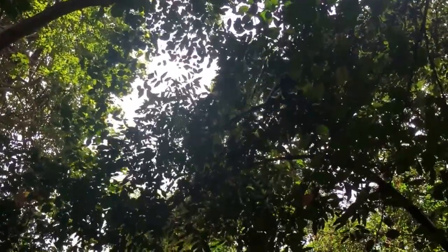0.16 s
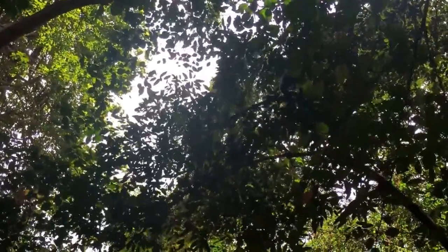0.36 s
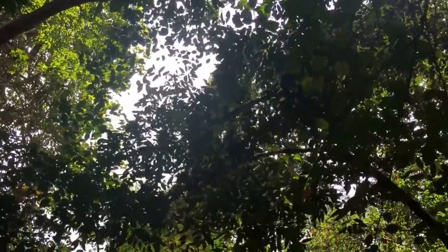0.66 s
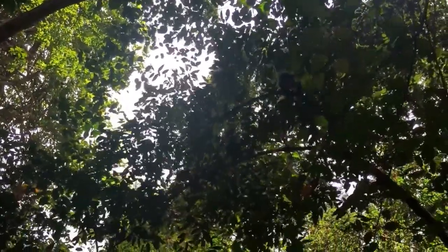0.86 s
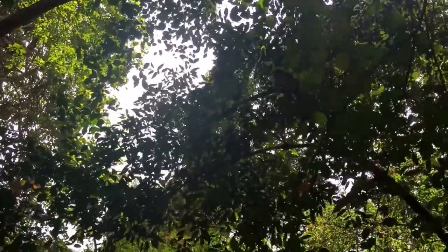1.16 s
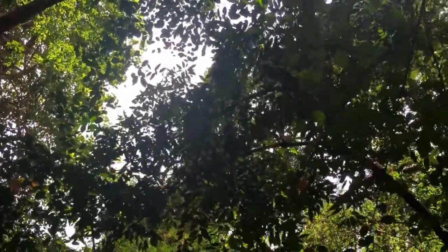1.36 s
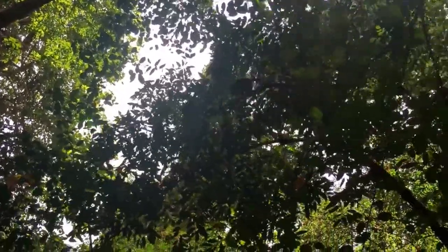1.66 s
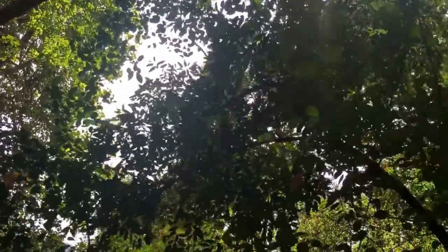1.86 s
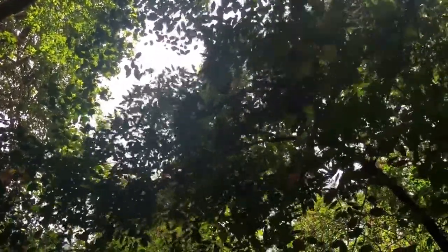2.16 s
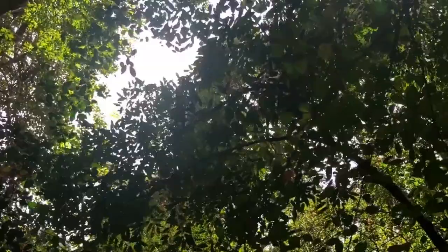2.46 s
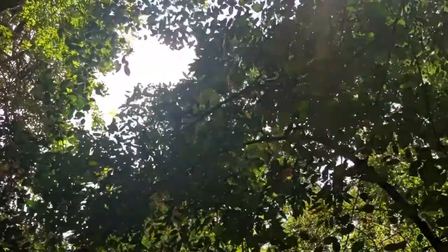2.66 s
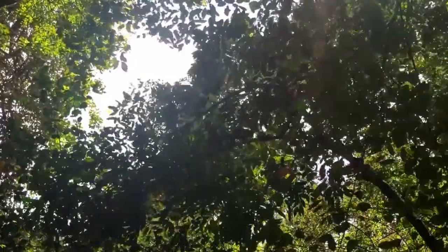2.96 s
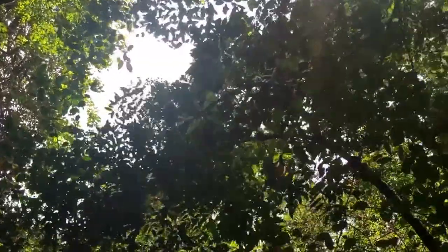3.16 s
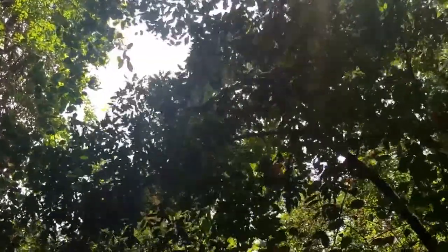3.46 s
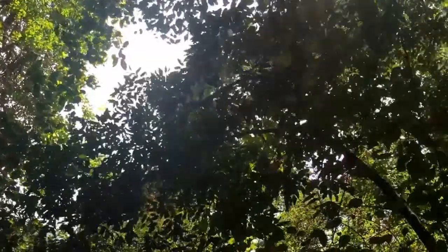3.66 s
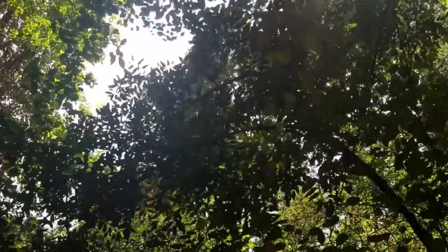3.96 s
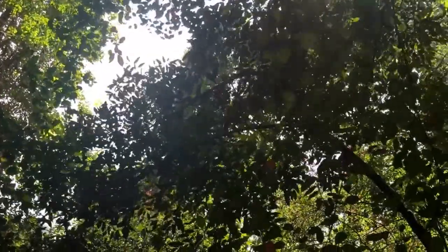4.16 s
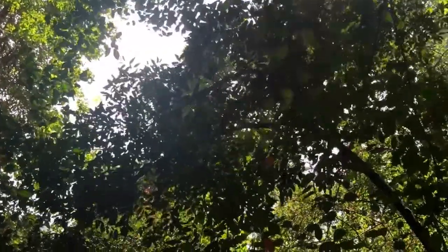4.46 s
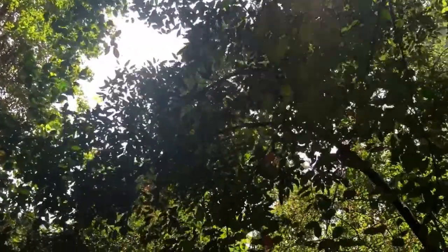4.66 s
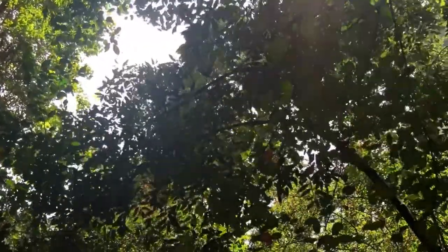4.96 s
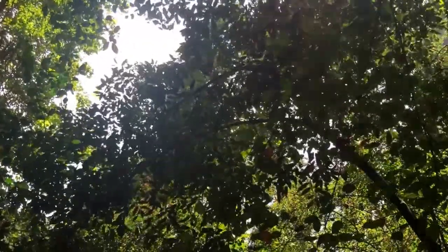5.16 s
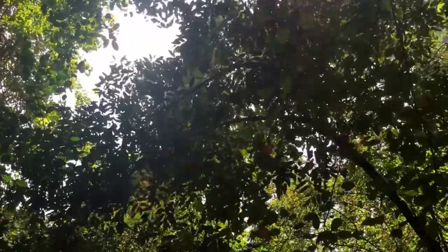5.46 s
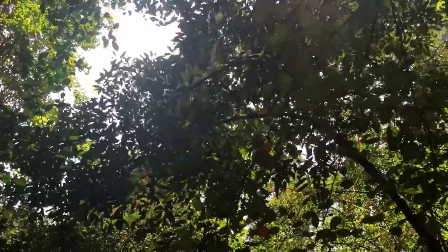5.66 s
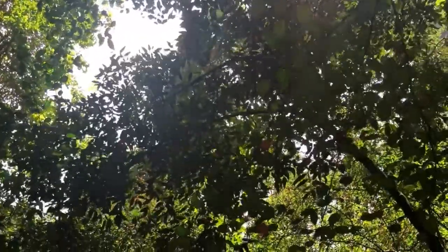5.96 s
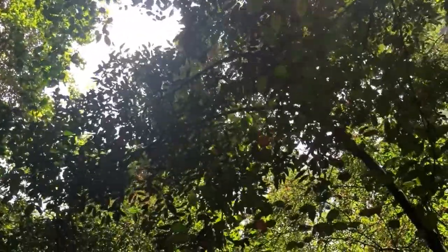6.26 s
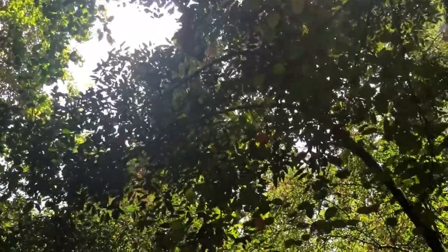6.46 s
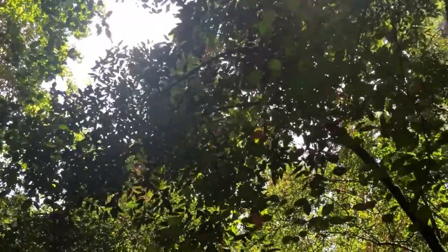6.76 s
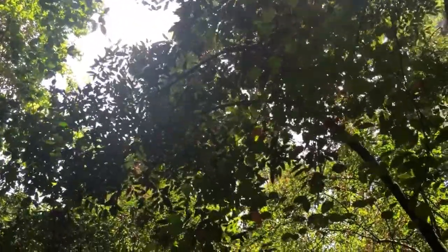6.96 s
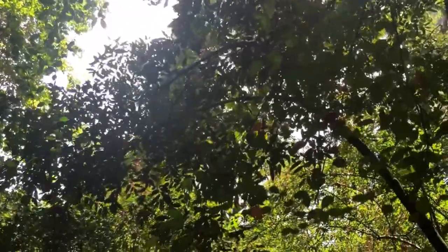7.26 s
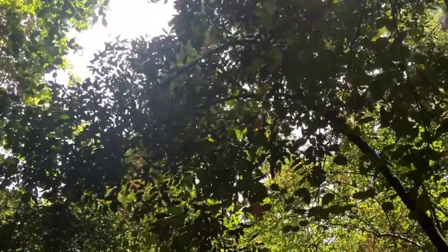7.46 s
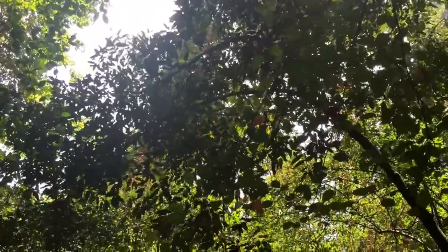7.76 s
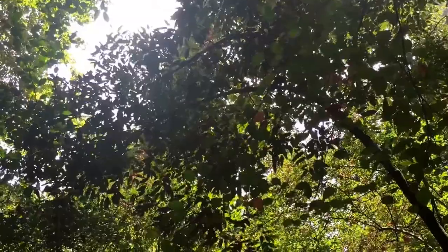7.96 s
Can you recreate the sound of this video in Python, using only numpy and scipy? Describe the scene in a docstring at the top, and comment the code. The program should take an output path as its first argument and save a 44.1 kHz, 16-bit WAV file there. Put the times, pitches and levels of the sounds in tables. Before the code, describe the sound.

Continuous high insect hiss fills a leafy forest, with a faint narrow buzzing chorus below it and a low, wavering motor hum far off through the trees. Early on, dry leaves near the microphone tick, then crackle sharply in two quick bursts, with patchy rustling that dies away by around three seconds. Afterwards the cicadas continue, gradually louder, over the soft low rumble. Centred mono sound.

```python
"""Far cicada choruses under a tropical canopy: overlapping singers blur to hiss in fixed bands, swelling
slowly. A lower insect chorus is dense clicks ringing a narrow body. A distant engine drones unevenly through
the trees as wavering multiples of its firing rate, over a low wash of filtered noise. Leaves nearby rustle
in a gust with two sharper bursts: patchy hiss, crackles, ticks and snaps. One microphone feeds both channels."""
import sys
import numpy as np
from scipy import signal
from scipy.io import wavfile
from scipy.ndimage import uniform_filter1d

SR = 44100
rng = np.random.default_rng(int(sys.argv[2]) if len(sys.argv) > 2 else 0)


def pcm_store(signal):
    """Save signal as 16-bit PCM."""
    levels = np.round(np.clip(np.atleast_2d(signal), -1, 1) * 32767)
    wavfile.write(sys.argv[1], SR, levels.astype(np.int16).T)


N = 358077


def amp(db):
    """Gain of a level in dB."""
    return 10 ** (np.asarray(db) / 20)


def evened(x):
    """Scaled to rms 1."""
    return x / np.sqrt(np.mean(x ** 2) + 1e-20)


def columns(rows):
    """Each column of a curve table after its start_s, drawn as straight lines with one value a sample."""
    start_s, *values = np.transpose(rows)
    return [np.interp(np.arange(N) / SR, start_s, v) for v in values]


def shape_db(points, hz):
    """A spectrum table read at hz along a log frequency axis, -120 dB outside its ends."""
    point_hz, db = np.transpose(points)
    return np.interp(np.log(hz + 1), np.log(point_hz + 1), db, -120, -120)


def drift(rate_hz):
    """Slow chance of rms 1: noise low-passed at rate_hz, after a second to settle."""
    sos = signal.butter(2, rate_hz, fs=SR, output="sos")
    return evened(signal.sosfilt(sos, rng.standard_normal(N + SR))[SR:])


def hiss(points, size, patchy_db):
    """Noise of rms 1 from random short-time spectra, coloured by a table, with drifting patches."""
    hop = size // 4
    frames = N // hop + 5
    hz = np.fft.rfftfreq(size, 1 / SR)
    real, imaginary, patches = rng.standard_normal((frames, len(hz), 3)).T
    patches = uniform_filter1d(patches, size=2, axis=0)  # across frequency
    patches = evened(uniform_filter1d(patches, size=8, axis=1))  # across time
    patches = np.minimum(patches, 1.1)  # hollows go deep, but no patch flares up
    gain = amp(shape_db(points, hz)[:, None] + patchy_db * patches)
    spectra = (real + 1j * imaginary) * gain
    return evened(signal.istft(spectra, nperseg=size, noverlap=size - hop)[1][:N])


def resonate(x, hz, width_hz):
    """A moving resonance: shifts the curve hz down to zero, smooths, and shifts back."""
    turn = np.exp(2j * np.pi * np.cumsum(hz) / SR)
    r = np.exp(-np.pi * width_hz / SR)
    return 2 * (turn * signal.lfilter([1 - r], [1, -r], x / turn)).real


def swells(rows, base_db):
    """A steady gain with bell-shaped swells added in power."""
    t = np.arange(N) / SR
    power = amp(2 * base_db)
    for centre_s, level_db, width_s in rows:
        power = power + amp(2 * level_db) * np.exp(-((t - centre_s) / width_s) ** 2)
    return np.sqrt(power)


def dips():
    """Gain of the low sounds: the bass dips briefly in bell-shaped hollows."""
    # moments of changed bass: centre_s, change_db
    hollows = [(.93, -4.5), (1.06, 0.5), (1.9, -8), (2.26, -9), (2.75, -8), (3.97, -1), (4.201, -8),
               (4.6, -2), (6.19, -4.5), (6.72, -4), (7.12, -7)]
    t, width_s = np.arange(N) / SR, 0.035
    return amp(sum(db * np.exp(-((t - centre_s) / width_s) ** 2) for centre_s, db in hollows))


def wash():
    """Low noise in four parts: fluttering wash, lowest rumble, a dull band and an even bed."""
    # colour of far traffic and air: frequency_hz, relative_db (per Hz)
    wash_colour = [(20, -48), (45, -18), (65, -15), (90, 3), (115, -4.5), (160, 4), (240, 0.5), (330, -6),
                   (450, -22), (600, -45)]
    # its level before flutter, dropouts and dips: start_s, level_db
    wash_level = [(0, -57.5), (.7, -58.5), (1.2, -55.5), (1.8, -59), (2.4, -57.5), (2.8, -57), (3.4, -56.5),
                  (3.85, -58), (4.8, -58.5), (5.3, -56), (5.9, -56.5), (6.5, -55.5), (7.1, -57),
                  (7.5, -56.5), (8.12, -56)]
    # swells of the lowest rumble: centre_s, level_db, width_s
    rumble_swells = [(1.55, -65, .1), (2.6, -75, 0.14), (3.12, -64, 0.069), (3.48, -59, 0.095),
                     (5.33, -61, 0.051), (6.5, -65, .15), (8.02, -62, 0.055)]
    # colour of the rumble: frequency_hz, relative_db (per Hz)
    rumble_colour = [(20, -37), (40, -17), (58, -13), (72, -11), (95, -30)]
    # swells of the dull band: centre_s, level_db, width_s
    dull_swells = [(0, -65.5, 0.11), (1.1, -67, 0.29), (3.15, -79, 0.16), (5.83, -67, 0.094),
                   (7.38, -67, 0.12), (7.52, -64, 0.088), (7.68, -67, 0.05), (8.12, -75, 0.11)]
    # colour of the dull band: frequency_hz, relative_db (per Hz)
    dull_colour = [(350, -7.5), (480, -5), (580, -1), (670, -1.5), (760, -8), (850, -15.5), (1000, -18)]
    # colour of the even bed of air: frequency_hz, relative_db (per Hz)
    air_colour = [(250, -19), (400, -4.5), (800, -0.5), (1400, -3), (2200, -9.5), (3000, -31)]

    dropouts_db = -9 * np.maximum(drift(34.4) - 0.8, 0)  # now and then the wash drops out briefly
    flutter_db = 2.6 * np.tanh(drift(9.4))
    low_db = columns(wash_level)[0] + dropouts_db + flutter_db
    low = dips() * amp(low_db) * hiss(wash_colour, size=2048, patchy_db=4.0)
    rumble_gain = dips() * swells(rumble_swells, base_db=-73.5) * amp(2.0 * drift(8.9))
    rumble = rumble_gain * hiss(rumble_colour, size=4096, patchy_db=6.0)
    dull = swells(dull_swells, base_db=-71.5) * hiss(dull_colour, size=1024, patchy_db=7.0)
    bed = amp(-70) * hiss(air_colour, size=1024, patchy_db=7.5)
    return low + rumble + dull + bed


def engine():
    """Multiples of an uneven firing rate; each wavers alone after many paths through the trees."""
    # course before wavering: start_s, firing_hz, level_db (2nd multiple), then relative to that level:
    # first_db, third_db, upper_db (reference of the upper multiples)
    engine_course = [(0, 75.3, -68.5, -2, -4, -2), (.5, 75, -64.5, 3.5, -11, -0.5),
                     (.9, 75.2, -62.5, 1, -4, -4), (1.45, 76.06, -55, -15, -10, -6),
                     (2, 74.64, -64.5, -5, 2, -5.5), (2.5, 75.6, -61, -14, -7, -15),
                     (2.9, 76.1, -67, -7, -9, -7), (3.25, 74.5, -58, -10, 1.5, -9),
                     (3.55, 75.96, -52.5, -26, -9.5, -9.5), (4.3, 77.24, -68, 7.5, 2.5, -6),
                     (4.8, 76.15, -60.5, -9, -5, -8), (5.4, 77.8, -71, 6.5, 6, 2),
                     (5.9, 77.4, -61, -6, -3.5, -4), (6.5, 75.05, -57.5, -9, -5, -20),
                     (7, 74.2, -59, 2.5, -5, -5), (7.45, 73.24, -54.5, -6, 1, -7),
                     (7.75, 73.5, -61, 3, -1, -2.5), (8.12, 73.4, -55, -7, -1, -11)]
    # upper multiples: multiple, relative_db (to upper_db)
    upper_orders = [(4, -5), (5, -12.5)]
    fading_db, fading_hz = 1.5, 18  # each of the three low multiples fades in and out on its own

    firing_hz, level_db, first_db, third_db, upper_db = columns(engine_course)
    turns = np.cumsum(firing_hz * (1 + 0.007 * drift(8))) / SR
    orders = []
    for k, db in enumerate([first_db, 0, third_db], 1):
        orders.append((k, db + fading_db * drift(fading_hz)))
    for k, db in upper_orders:
        orders.append((k, upper_db + db))
    out = np.zeros(N)
    for k, db in orders:
        # the share that arrives by shifting detours
        scattered = 0.8 * (drift(12) + 1j * drift(12))
        out += amp(level_db + db) * ((1 + scattered) * np.exp(2j * np.pi * k * turns)).real
    return amp(2.1 * drift(20)) * out  # uneven firing makes all multiples throb together


def low_chorus():
    """A lower-voiced insect chorus: dense irregular clicks ring a narrow body, throbbing loosely."""
    # course of the chorus: start_s, level_db, pitch_hz (before it wanders)
    chorus_course = [(0, -64, 1695), (.4, -63, 1737), (.9, -62, 1760), (1.03, -60.5, 1750),
                     (1.15, -65, 1701), (1.8, -60.5, 1750), (2.2, -59, 1710), (2.36, -63.5, 1710),
                     (2.47, -56, 1700), (2.6, -60.5, 1680), (2.88, -62.5, 1690), (2.96, -62.5, 1700),
                     (3.2, -62.5, 1706), (4, -64, 1705), (5.2, -65, 1700), (5.65, -62, 1672),
                     (5.95, -65.5, 1716), (6.35, -63.5, 1704), (6.47, -61.5, 1720), (6.67, -65.5, 1722),
                     (7.1, -63.5, 1740), (7.7, -64.5, 1710), (8.12, -65, 1708)]
    # resonances of the body: multiple (of the pitch), width_hz (of one pass), gain_db
    body_resonances = [(1, 55, 3.5), (1, 300, 5), (1.18, 59, -15)]

    level_db, pitch_hz = columns(chorus_course)
    throb_db = 1.7 * np.tanh(drift(9.1))
    clicks = rng.standard_normal(N) * (rng.random(N) < 3000 / SR) * amp(throb_db)  # 3000 a second
    # the pitch wanders as other singers take the lead
    hz = pitch_hz * (1 + 0.006 * drift(6))
    body = np.zeros(N)
    for multiple, width_hz, gain_db in body_resonances:
        # each resonance acts twice, for steep flanks
        once = resonate(clicks, multiple * hz, width_hz)
        body += amp(gain_db) * resonate(once, multiple * hz, width_hz)
    return amp(level_db) * evened(body)


def ticks():
    """Small dry leaves ticking: scattered short rings of many pitches and sizes, rms 1."""
    ticks_per_s, ring_s = 260, 0.02  # ring_s: time to fall 60 dB
    t, out = np.arange(1000) / SR, np.zeros(N)
    pitches = np.geomspace(1500, 3800, num=20)
    for hz in pitches:
        sizes = amp(3.0 * np.minimum(rng.exponential(1, N), 3))
        hits = sizes * (rng.random(N) < ticks_per_s / len(pitches) / SR)
        ring = amp(-60 * t / ring_s) * np.sin(2 * np.pi * hz * t)
        out += signal.oaconvolve(hits, ring)[:N]
    return evened(out)


def rustle():
    """Nearby leaves rubbing: a patchy hiss, roughened by dense small crackles of unequal size."""
    # the gust in the leaves, before its flutter: start_s, level_db
    gust_course = [(0, -70), (.6, -69), (.95, -66.5), (1.19, -64), (1.22, -54), (1.38, -53), (1.5, -55),
                   (1.6, -55.5), (1.75, -55.5), (1.78, -55), (2.1, -58), (2.3, -57.5), (2.39, -60),
                   (2.7, -60), (3.1, -66.5), (3.7, -68.5), (6, -71), (8.12, -72)]
    # strokes of leaf on leaf: peak_s, peak_db (small leaves), fade_s, large_db (larger leaves above it)
    leaf_strokes = [(.305, -58.5, 0.024, -5), (.41, -65, 0.048, -14), (.52, -63, 0.03, -14),
                    (.75, -63, .06, -13), (.88, -63, .05, -13), (1.085, -54.5, 0.026, -8),
                    (1.164, -59, 0.015, -16), (1.215, -58, 0.037, -1), (1.255, -53, 0.035, -16),
                    (1.45, -62.5, 0.062, 5), (1.57, -51, 0.025, -2.5), (1.632, -49, 0.033, -14),
                    (1.68, -56, .03, -5), (1.72, -60.5, 0.04, 1), (1.81, -61, .03, -13),
                    (2.2, -64, 0.051, -5), (2.33, -58, .03, -4), (2.42, -60, 0.033, -16),
                    (2.62, -63, 0.054, -2.5), (2.79, -62, .03, -1), (3.15, -67, 0.03, -14),
                    (3.26, -59, .015, -14), (5.752, -66, .15, -7), (8.0, -62, 0.074, -9)]
    # colour of the small leaves: frequency_hz, relative_db (per Hz)
    small_colour = [(1000, -48), (1500, 0.5), (2000, 3.5), (2450, 2.5), (2850, -1), (3400, 1.5),
                    (4100, -3.5), (4700, -4.5), (6500, -8), (11000, -15), (13000, -38)]
    # colour of the larger, lower leaves: frequency_hz, relative_db (per Hz)
    large_colour = [(250, -44), (400, -2), (800, -3.5), (1300, -1.5), (1700, -17), (2400, -67)]
    rise_s = 0.0051  # stroke rise; rise and fade are times for power to change e-fold

    t = np.arange(N) / SR
    gust_db = columns(gust_course)[0] + 1.0 * drift(26)
    small_power = amp(2 * gust_db)
    large_power = amp(2 * (gust_db - 6.5))
    for peak_s, peak_db, fade_s, large_db in leaf_strokes:  # quick rise, slower fade
        envelope = np.exp(np.where(t < peak_s, (t - peak_s) / rise_s, (peak_s - t) / fade_s))
        stroke = amp(2 * peak_db) * envelope
        small_power = small_power + stroke
        large_power = large_power + stroke * amp(2 * large_db)
    # 250 crackles a second, each fading over 14 ms
    crackle = amp(0.88 * np.minimum(rng.exponential(1, N), 4)) * (rng.random(N) < 250 / SR)
    faded = signal.lfilter([1], [1, -np.exp(-1 / (0.014 * SR))], crackle)
    grain = 1 + 0.36 * evened(faded)
    small = np.sqrt(small_power) * hiss(small_colour, size=512, patchy_db=2.2)
    large = np.sqrt(large_power) * hiss(large_colour, size=512, patchy_db=3.5)
    ticking = amp(-7.5) * np.sqrt(small_power) * ticks()
    return evened(grain) * (small + large) + ticking


def snaps():
    """Short dying rings of single dry leaves."""
    # leaf snaps: start_s, level_db (before the soft onset), pitch_hz, ring_s (to fall 60 dB)
    leaf_snaps = [(.307, -42, 1950, .012), (.405, -54, 2550, 0.054), (.518, -56, 2460, .04),
                  (.78, -51, 2255, .04), (.81, -56, 2270, .06), (.92, -53, 2290, 0.054),
                  (1.0877, -46, 2600, .006), (1.1641, -40, 2700, .006), (1.222, -44, 1250, .02),
                  (1.224, -44, 2690, 0.049), (1.235, -30, 4120, .006), (1.2365, -33, 5500, .005),
                  (1.24, -37, 4100, .008), (1.257, -34, 2500, 0.0055), (1.2575, -43, 1850, 0.037),
                  (1.275, -38, 4200, .006), (1.28, -48, 2320, 0.038), (1.395, -46, 1800, .03),
                  (1.5537, -43, 2190, .012), (1.5726, -40, 2500, .008), (1.5795, -36, 3700, .006),
                  (1.595, -38, 3900, .012), (1.61, -47, 2350, .03), (1.637, -40, 2900, .008),
                  (1.642, -40, 2500, .01), (1.6485, -36, 2300, .006), (1.65, -40, 3370, .012),
                  (1.662, -41, 2900, .008), (1.7143, -41, 2000, .015), (1.745, -45, 2300, .015),
                  (1.765, -51, 2000, .03), (2.2049, -46, 2180, .015), (2.2473, -42, 2130, .015),
                  (2.338, -48, 2150, 0.036), (2.42, -40, 2500, .008), (2.44, -44, 2900, .006),
                  (2.791, -47, 2900, .005), (3.1732, -44, 2590, 0.0065), (3.2595, -45, 2600, .004)]
    out, t = np.zeros(N), np.arange(2000) / SR
    rise = 1 - np.exp(-t / 0.0003)
    for start_s, level_db, pitch_hz, ring_s in leaf_snaps:
        ring = rise * amp(level_db - 60 * t / ring_s) * np.sin(2 * np.pi * pitch_hz * t)
        out[round(start_s * SR):][:len(t)] += ring
    return out


def cicadas():
    """So many far singers overlap that their clicks blur to a hiss with the colour of their bodies."""
    # main chorus before shimmer: start_s, level_db, treble_db (treble chorus relative to it)
    chorus_course = [(0, -57, -11), (.36, -55, -12.5), (.55, -53, -11), (1, -55, -10), (1.25, -52.5, -10),
                     (1.6, -51.5, -7.5), (2.1, -50.5, -9), (2.6, -51, -10.5), (2.8, -53, -6.5),
                     (3.2, -49.5, -11.5), (3.5, -51, -8.5), (4.15, -53, -13.5), (4.75, -50.5, -11),
                     (5.4, -49, -10.5), (5.8, -50, -11.5), (7, -48, -9), (7.6, -49, -11), (8.12, -48, -9.5)]
    # middle chorus before its drift: start_s, level_db
    middle_course = [(0, -59), (.95, -58.5), (1.09, -54), (1.2, -57), (1.8, -57), (2.3, -56), (3.12, -57),
                     (3.55, -54), (4.15, -59), (4.8, -56), (5.8, -55.5), (7, -54.5), (8.12, -55)]
    # colour of the middle chorus: frequency_hz, relative_db (per Hz)
    middle_colour = [(2700, -36), (3100, -11), (3600, -6.5), (3950, -1.5), (4140, 2), (4400, -1.5),
                     (4900, -6.5), (5500, -38)]
    # colour of the main chorus: frequency_hz, relative_db (per Hz)
    main_colour = [(4200, -40), (4900, -10.5), (5300, -0.5), (5650, 2), (6000, -1), (6500, -3), (8000, -3),
                   (8900, -1.5), (9400, -3.5), (10400, -15.5), (12000, -14)]
    # colour of the treble chorus: frequency_hz, relative_db (per Hz)
    treble_colour = [(9800, -1), (10400, -2), (11300, 4), (12300, 3.5), (13500, -2.5), (14600, -4.5),
                     (16500, -26)]

    level_db, treble_db = columns(chorus_course)
    middle_db = columns(middle_course)[0] + 0.49 * drift(2.5)
    middle = amp(middle_db) * hiss(middle_colour, size=1024, patchy_db=2.5)
    main = amp(level_db) * hiss(main_colour, size=1024, patchy_db=1.8)
    treble_gain = amp(level_db + treble_db + 0.31 * drift(19.0))
    treble = treble_gain * hiss(treble_colour, size=1024, patchy_db=3.5)
    # the two higher choruses shimmer together
    shimmer = drift(26.0)
    shimmer = evened(shimmer - uniform_filter1d(shimmer, size=4000))  # quick changes only
    return middle + amp(0.5 * shimmer) * main + amp(0.47 * shimmer) * treble


def scene():
    """Everything reaches one microphone, which feeds both channels."""
    far = wash() + dips() * engine() + low_chorus() + cicadas()
    near = rustle() + snaps()
    return np.tile(far + near, (2, 1))


def record(dry):
    """The band limit: a steep low-pass ends the treble."""
    edge_hz = 15295
    low_pass = signal.firwin(1023, edge_hz, window=("kaiser", 9), fs=SR)
    return signal.oaconvolve(dry, low_pass[None], "same")


dry = scene()
out = record(dry)
pcm_store(out)
```